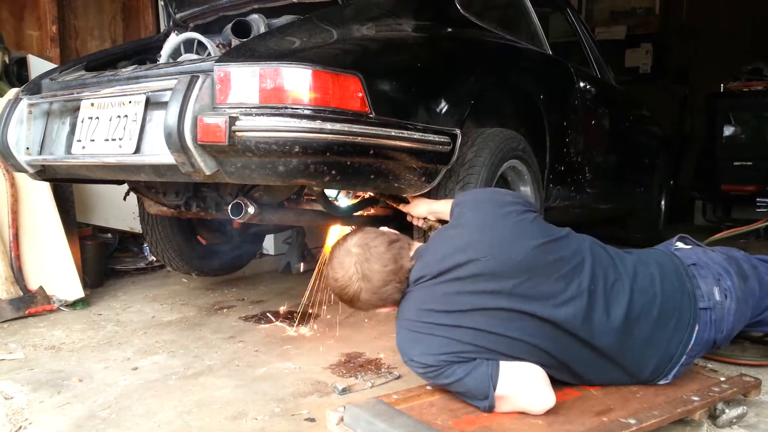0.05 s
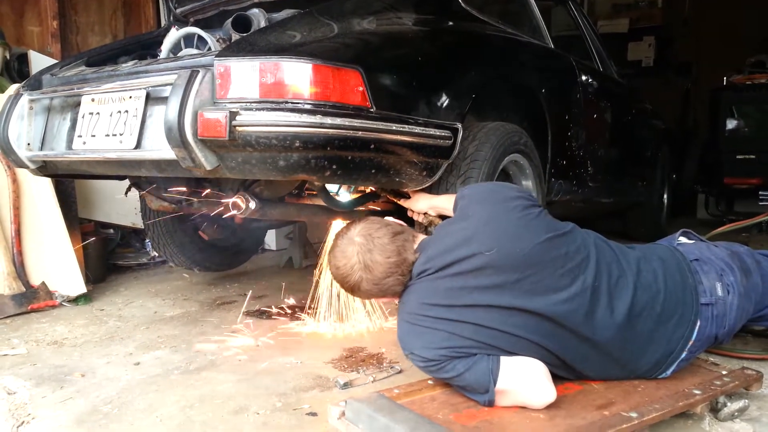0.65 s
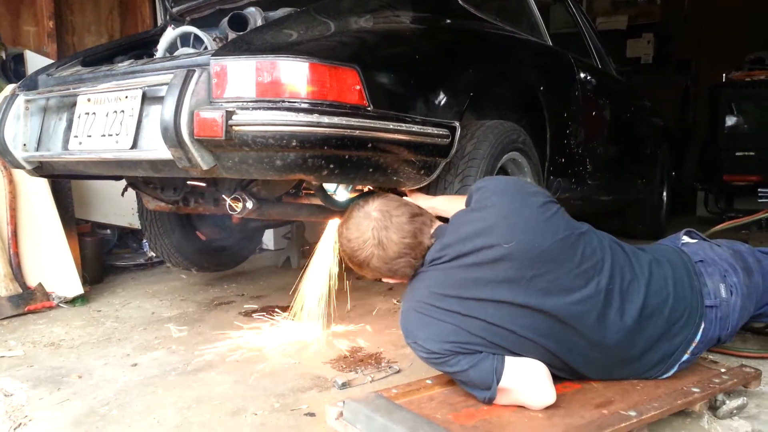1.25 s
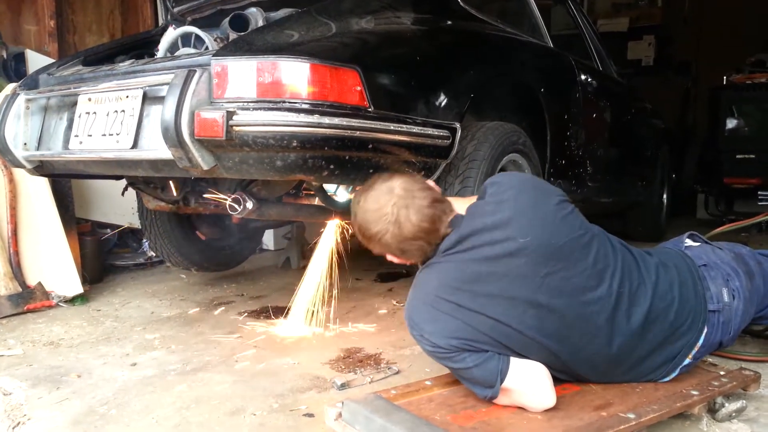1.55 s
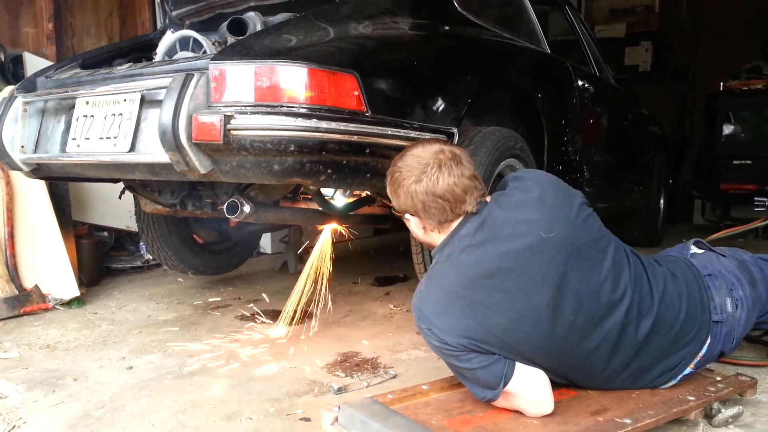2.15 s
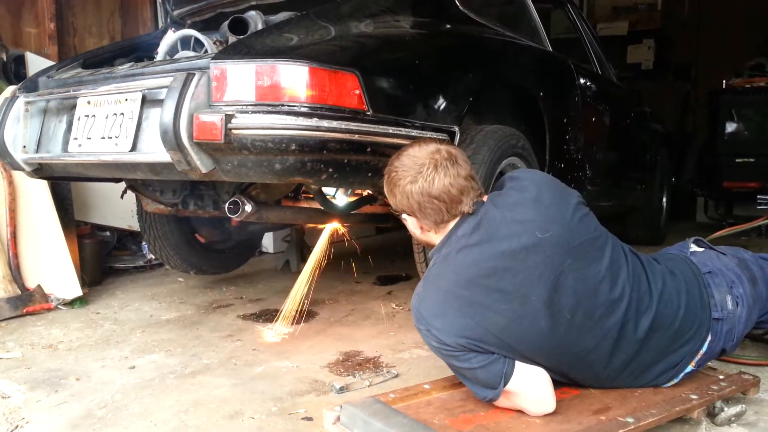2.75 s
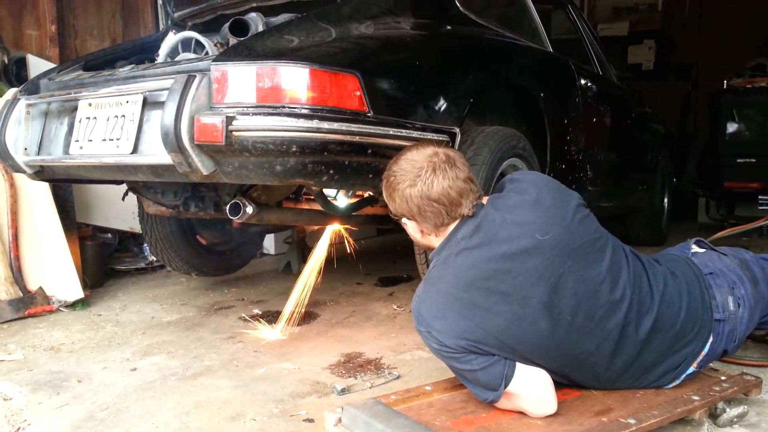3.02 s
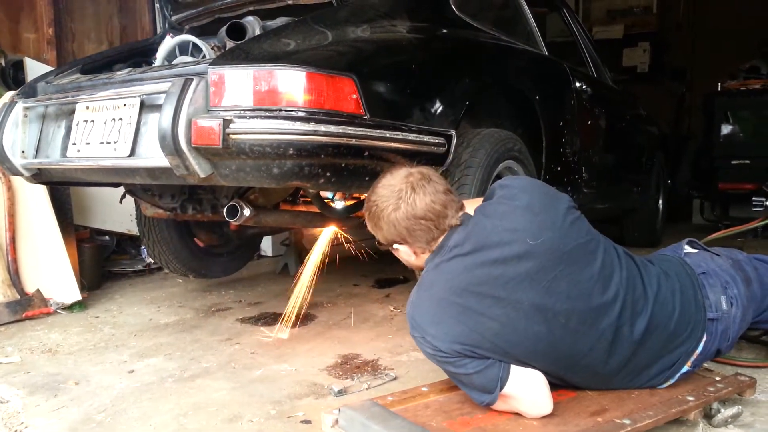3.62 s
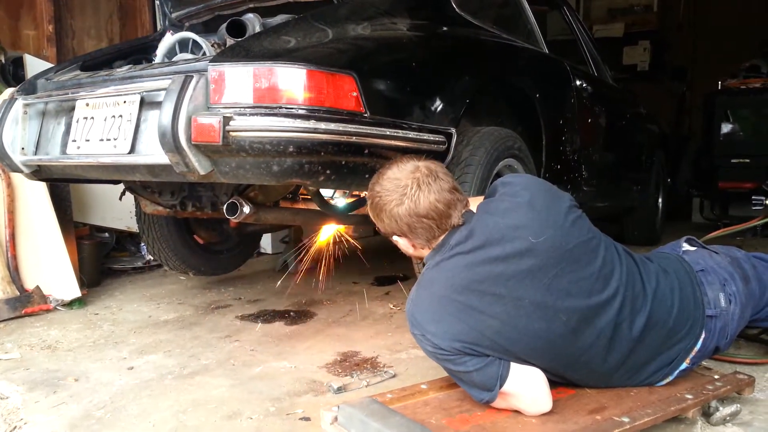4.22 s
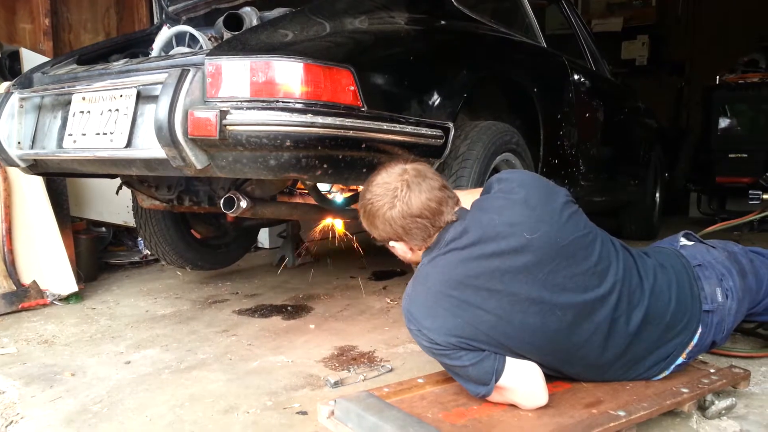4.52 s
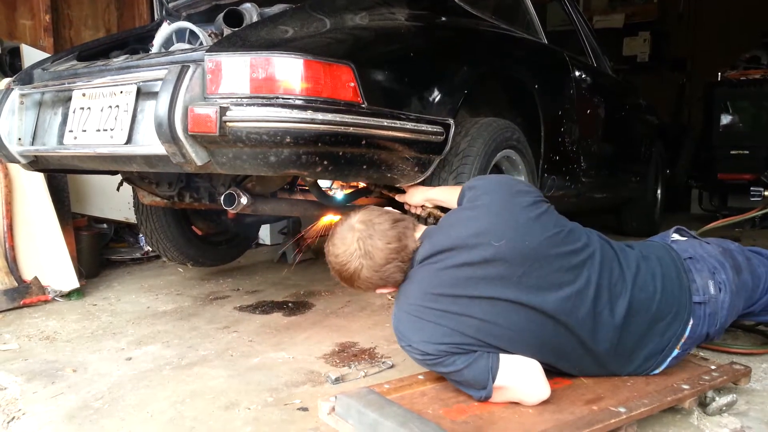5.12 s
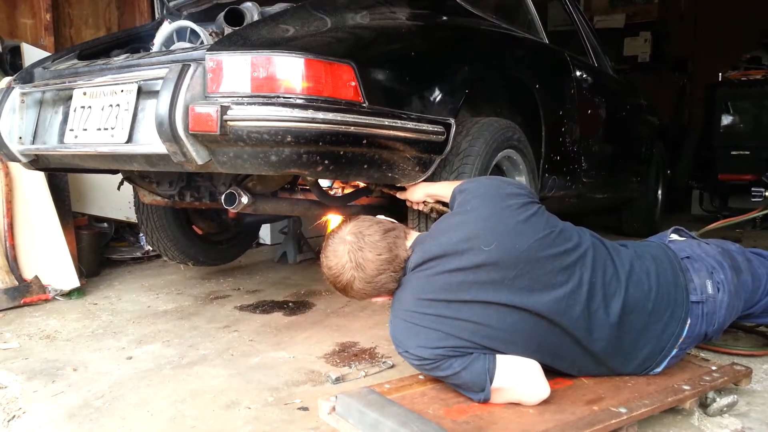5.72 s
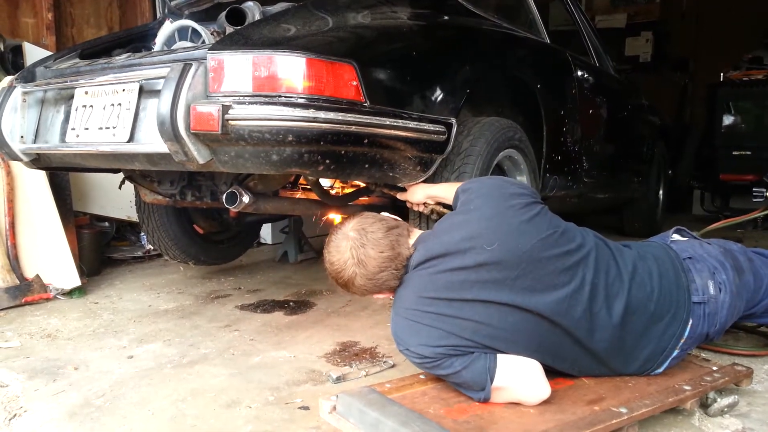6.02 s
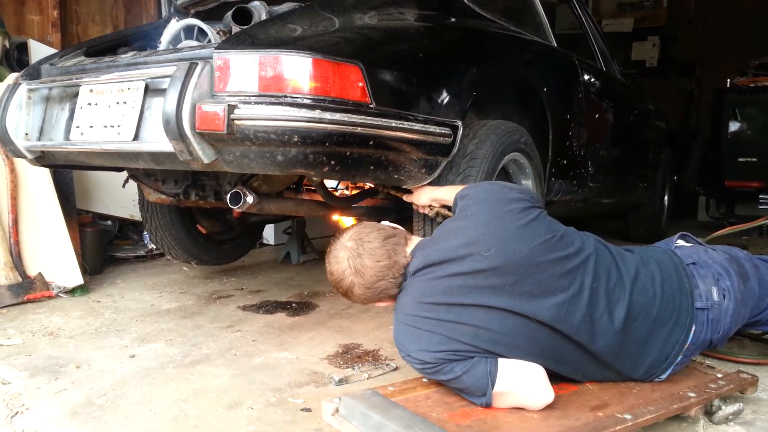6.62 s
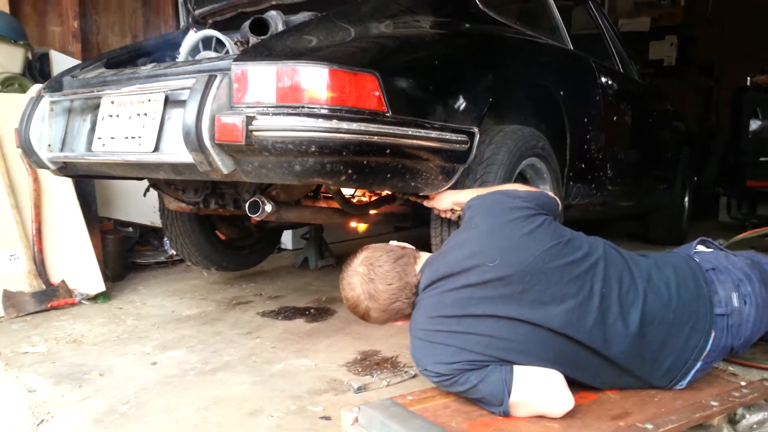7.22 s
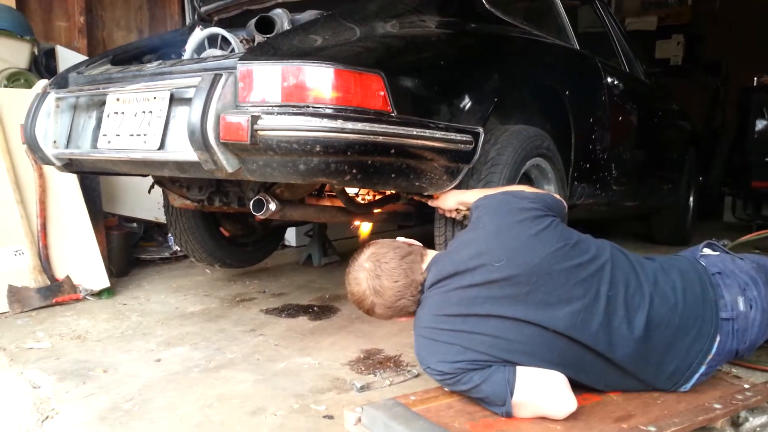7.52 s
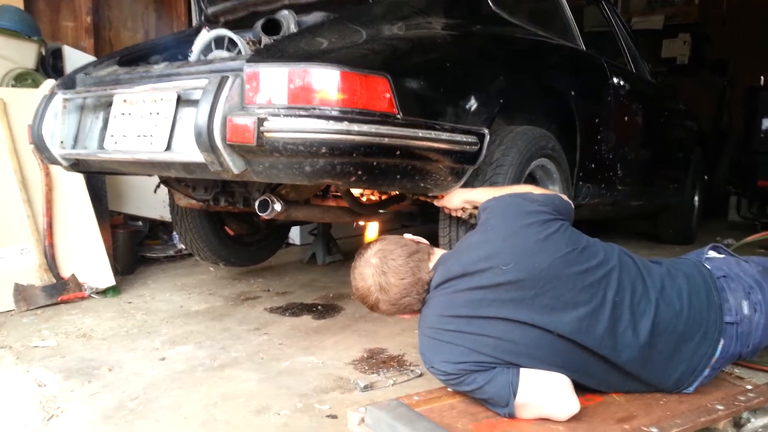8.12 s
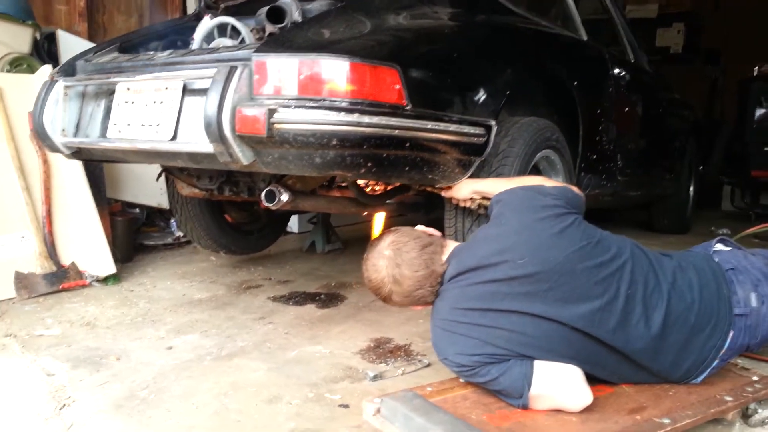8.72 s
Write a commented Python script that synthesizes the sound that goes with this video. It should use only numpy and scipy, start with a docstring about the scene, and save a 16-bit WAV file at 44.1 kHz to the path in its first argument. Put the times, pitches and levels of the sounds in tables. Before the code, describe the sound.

The loud hiss of a torch cutting metal in a garage eases into a quieter, wavering flame rush with faint crackling sparks.

```python
"""A hiss over a roaring flame: an oxy-fuel torch cuts a steel exhaust under a car in a garage.
The turbulent oxygen jet excites the resonances of the hollows round it, turns shrill as it breaks
through, and is shut off. The heating flame roars on, on and off the pipe, while molten slag spits.
Floor and car reflect the sound to a stereo microphone two metres away; air rumbles at its left port."""
import sys
import numpy as np
from scipy import signal
from scipy.fft import rfft, irfft, next_fast_len
from scipy.io import wavfile
from scipy.ndimage import uniform_filter1d

SR = 44100
rng = np.random.default_rng(int(sys.argv[2]) if len(sys.argv) > 2 else 0)


def store_pcm(level_fs):
    """Save levels as 16-bit WAV."""
    pcm = np.round(np.clip(level_fs, -1, 1) * 32767).astype(np.int16)
    wavfile.write(sys.argv[1], SR, np.atleast_2d(pcm).T)


N = 394693
TIME = np.arange(N) / SR
FFT_SIZE = next_fast_len(N, True)
FREQ = np.maximum(np.arange(FFT_SIZE // 2 + 1) * SR / FFT_SIZE, 1)

# Turbulence spectra: frequency_hz, density_db. Their modes: centre_hz, width_hz, lift_db (< 0: a notch)
JET_IN_CUT, JET_IN_CUT_MODES = [(60, -56), (140, -56), (232, -47), (290, -4.5), (600, -2.2), (800, -7),
                                (1100, -2), (2500, 5), (4200, 4.5), (5400, 3), (6300, -1), (8000, -2.5),
                                (10000, -6), (14300, -11.5)], [(499, 52, 10.6), (578, 28, 4.3), (720, 31, 5.4),
                                             (891.6, 65, 17.6), (1032, 86, 11), (1126, 118, 9.2),
                                             (1287, 34, 10.7), (1490, 48, 11), (1713, 173, 9.1),
                                             (2250, 170, 4.8), (2457, 130, 3.7), (2770, 140, 4.3),
                                             (3090, 35, 3.5), (3260, 54, 4.8), (3480, 150, 5.1),
                                             (3790, 320, 2.9), (4680, 160, 3.7), (5240, 68, 3.5)]
FREE_JET, FREE_JET_MODES = [(100, -59), (1000, -55), (4500, -4), (6500, -1), (8000, 1.5), (12500, 2.5),
                            (14500, -4.5)], [(7900, 500, 4.2), (9100, 90, 4), (9600, 90, 3.3),
                                              (10440, 150, 7.2), (11000, 80, 3), (11470, 230, 4.5)]
FLAME_ON_PIPE, FLAME_ON_PIPE_MODES = [(25, -44), (60, -51), (130, -15), (220, -6.5), (600, -9.5),
                                      (800, -5.5), (1100, 0), (2500, -1.1), (4200, -3), (5400, -7),
                                      (6300, -11), (10000, -12.5), (13000, -18), (14300, -23)], [(361, 38, 10), (445, 44, 15), (497, 37, 14.5),
                                                       (548, 38, -13), (600, 34, 8), (690, 120, 8),
                                                       (885, 43, 13.5), (1150, 140, 3.5), (1405, 80, 2.5),
                                                       (1750, 160, 3.5), (2165, 74, 1.5), (3590, 190, 4)]
FLAME_IN_AIR, FLAME_IN_AIR_MODES = [(25, -55), (60, -53), (130, -17), (220, -3), (290, -7.5), (600, -3),
                                    (800, -2), (1100, -2), (2500, -1.1), (4200, -1.9), (5400, -2.5),
                                    (6300, -7.5), (10000, -6.5), (13000, -8.5), (14300, -14)], [(362, 50, 4.2), (467, 64, 12.7), (780, 34, 2.8),
                                                      (910, 65, 7.2), (1150, 72, 4.8), (1420, 60, 3.3),
                                                      (1944, 65, 3.9), (2190, 40, 2.8), (4460, 430, 1.5)]
FLAME_IN_HOLE, FLAME_IN_HOLE_MODES = [(25, -55), (60, -53), (130, -18), (220, -8), (600, -9.5), (800, -5),
                                      (1100, -5), (2500, 4.5), (4200, -4.5), (5400, 0), (6300, -10),
                                      (10000, -12), (13000, -31), (14300, -23)], [(358, 63, 7.5), (470, 80, 0), (555, 36, -5),
                                                       (600, 35, 11), (760, 45, 6), (930, 98, 7),
                                                       (1150, 80, -1), (1470, 82, 9.5), (1790, 100, 4),
                                                       (1940, 100, 2), (3150, 210, -0.5), (3700, 130, 5),
                                                       (4530, 200, 7)]
FLARE_SPECTRUM, FLARE_MODES = [(130, -55), (240, -29), (320, 4), (600, -6), (800, 1), (1100, 3.5),
                               (2500, 6), (4200, -1.5), (5400, 2), (6300, -6), (14300, -12)], [(490, 77, 12), (548, 36, -7), (892, 35, 15), (1100, 110, 3),
                                              (1440, 100, 3), (1870, 160, 2.5), (3650, 250, 2)]

# Stream strength: time_s, level_db
CUT_LEVEL = [(.2, -13.5), (.5, -13.5), (.8, -13.5), (1.6, -13), (2.7, -13), (3.25, -13), (3.5, -15.5),
             (3.78, -17)]  # the jet in the steel fades as the cut opens
NOZZLE_LEVEL = [(0, -43), (4.0, -32.5), (5.7, -27), (6.1, -27), (7.0, -24), (7.9, -24.5), (8.3, -24),
                (8.5, -24.5), (8.9, -22)]  # the flame's hiss grows as the nozzle comes out from behind the pipe
# Sustained events: start_s, stop_s, level_db
PIPE_TOUCHES = [(-.2, .16, -19), (3.78, 4.25, -21), (4.25, 4.7, -22), (4.7, 5.5, -21.5), (5.5, 5.85, -22.5),
                (5.85, 6.29, -28), (6.29, 6.9, -24)]  # the flame plays on the pipe
HOLE_TOUCHES = [(7.955, 8.31, -22), (8.31, 8.38, -26), (8.38, 8.72, -22.5), (8.72, 9.2, -26.5)]  # the flame blows into the cut hole
FLARES = [(.145, .335, -18.5), (3.95, 4.21, -22.7), (4.73, 4.88, -27.5), (4.93, 5.1, -30),
          (5.37, 5.47, -25), (6.3, 6.45, -36), (6.53, 6.67, -30), (7.965, 8.14, -23), (8.4, 8.48, -28.5)]  # the steel flares up
RUMBLE_SPANS = [(2.1, 2.2, -39), (3.92, 5.68, -43), (5.92, 7.23, -47), (7.87, 8.95, -42.5)]  # a low rumble is heard on the left
# Bell-shaped events: peak_s, level_db, sigma_s
LOW_BLIPS = [(.29, -48, 0.01), (.4, -42.5, 0.015), (.52, -41.5, 0.013), (.59, -48, .012), (.68, -40, .018),
             (.93, -49, 0.027), (1.48, -45, 0.013), (1.66, -41, 0.0073), (1.95, -44, 0.011),
             (2.06, -41, 0.019), (2.7, -47, .012), (2.76, -36, 0.011), (3.2, -42.5, 0.015),
             (3.88, -39, 0.059), (4.08, -37, 0.082)]  # faint, brief blips near 220 Hz
RUMBLE_SWELLS = [(2.15, -28.5, 0.065), (4.01, -30, .03), (4.22, -34, 0.022), (4.77, -36, 0.026),
                 (5.064, -32, 0.023), (5.24, -36, 0.017), (5.35, -39, .02), (6.07, -37, .02),
                 (6.643, -21.5, 0.022), (6.79, -33, .018), (7.16, -31, 0.03), (7.902, -27, .022),
                 (8.137, -24, 0.048), (8.258, -26, 0.019), (8.78, -27.5, 0.042)]  # short, soft swells of the rumble
# Edges and hollows singing in the stream: start_s, stop_s, first_hz, last_hz, width_hz, relative_db
EDGE_TONES = [(-.2, 0.371, 1150, 1210, 130, -10), (.12, 0.496, 1853, 2037, 130, -13.5),
              (0.54, 1.196, 579, 595, 28, -16), (1.15, 2.696, 577.6, 568, 35, -24),
              (0.251, 1.046, 3630, 3860, 600, -10.5), (.75, 1.8, 1806, 1736, 220, -12),
              (.8, 1.496, 3760, 4350, 450, -13), (1.198, 3.107, 4740, 4700, 180, -25),
              (2.205, 3.8, 1010, 974, 110, -21), (2.6, 3.55, 3540, 3390, 240, -11),
              (2.699, 3.805, 8050, 7900, 550, -17), (3.3, 3.85, 566, 568, 45, -21.5),
              (3.75, 4.294, 1020, 910, 90, -11), (3.8, 4.304, 516, 486, 70, -8),
              (3.8, 4.456, 1480, 1444, 100, -11), (3.85, 4.35, 3520, 3540, 280, -9.5),
              (4.15, 4.9, 890, 885, 50, -15), (4.7, 5.75, 1180, 1160, 240, -12),
              (4.9, 5.703, 1413, 1370, 140, -18), (6.247, 6.9, 1820, 1845, 200, -12.5),
              (6.25, 7.1, 445, 453, 65, -17.5), (6.25, 7.0, 874, 868, 55, -16),
              (6.45, 7.054, 1172, 1159, 110, -13.5), (6.9, 7.7, 4500, 4290, 280, -13),
              (7.0, 8.31, 2000, 1956, 90, -16), (7.45, 8.198, 4300, 4560, 260, -18),
              (7.7, 9.205, 925, 981, 85, -16), (7.5, 9.198, 1446, 1438, 75, -16),
              (8.35, 9.3, 7300, 7330, 900, -14)]
# Hard surfaces near the flame: delay_ms, reflected_share, sway_ms
SURFACES = [(.85, 0.089, 0.058), (1.5, 0.066, 0.14), (3.0, 0.11, 0.14), (5.1, 0.17, 0.069),
            (7.2, 0.17, 0.18), (10.1, 0.13, 0.091)]
# Gaps in the low roar: start_s, stop_s, cutoff_hz
THINNINGS = [(1.344, 1.43, 370), (1.752, 1.982, 350), (3.554, 3.76, 410)]

# The two microphone ports
PORT_COHERENCE = [(60, .5), (200, .8), (400, .9), (700, .88), (1300, .72), (2500, .55), (5000, .52),
                  (14000, .38)]  # frequency_hz, shared_power_fraction
PORT_PHASE = [(600, 0), (1200, -.25), (1500, -1.0), (2200, -1.3), (2500, -2.6), (3450, 0), (4800, -1.4),
              (6000, -1.9), (11200, -2.3), (14200, -2.5)]  # frequency_hz, left_lead_rad
PORT_BALANCE = [(300, 0.74), (700, -0.25), (1100, 1.5), (2200, 0.68), (4200, -1), (8000, 0.79),
                (13000, 1.7)]  # frequency_hz, left_minus_right_db
PORT_COLOUR = [(8500, 0), (9900, -2), (11000, -0.5), (12100, -0.2), (12900, -0.5), (13900, 3)]  # frequency_hz, gain_db


def undb(db):
    """Amplitude grows tenfold for every 20 dB."""
    return 10 ** (np.asarray(db) / 20)


def across(points):
    """Interpolation of (frequency_hz, value) points on a logarithmic frequency axis."""
    hz, value = np.transpose(points)
    return np.interp(np.log(FREQ), np.log(np.maximum(hz, 1)), value)


def waveform(spectrum):
    """The inverse Fourier transform turns a spectrum into a signal."""
    return irfft(spectrum, FFT_SIZE)[..., :N]


def filtered(x, gain):
    """Linear filtering multiplies each frequency by its gain."""
    return waveform(rfft(x, FFT_SIZE) * gain)


def unit(x):
    """Normalisation brings the mean of the channels to rms 1."""
    return x / np.std(np.atleast_2d(x).mean(axis=0))


def wander(rate_hz):
    """Twice-smoothed random steps give a slow fluctuation with a spread near 1."""
    hold = int(SR / rate_hz)
    steps = np.repeat(rng.standard_normal(N // hold + 1), hold)
    return np.sqrt(2) * uniform_filter1d(uniform_filter1d(steps, hold), hold)[:N]


def step(at_s, edge_s):
    """A raised-cosine transition from 0 to 1, centred on a moment."""
    return (1 + np.sin(np.pi * np.clip((TIME - at_s) / edge_s, -.5, .5))) / 2


def held(events, edge_s):
    """The envelope of events that rise, hold and fall."""
    return sum(undb(db) * step(start, edge_s) * (1 - step(stop, edge_s)) for start, stop, db in events)


def swells(events):
    """The envelope of events that swell and fade as Gaussian curves."""
    return sum(undb(db) * np.exp(-np.minimum(((TIME - peak) / sigma) ** 2, 100) / 2)
               for peak, db, sigma in events)


def stereo_noise():
    """Partial coherence: each port's noise spectrum has a shared direct part and its own scattered part."""
    direct, left, right = rfft(rng.standard_normal((3, FFT_SIZE)))
    shared = np.clip(across(PORT_COHERENCE), 0, 1)
    left = np.sqrt(shared) * direct * np.exp(1j * across(PORT_PHASE)) + np.sqrt(1 - shared) * left
    right = np.sqrt(shared) * direct + np.sqrt(1 - shared) * right
    lean = undb(across(PORT_BALANCE) / 2)
    return np.array([left * lean, right / lean])


def gas_stream(spectrum, modes):
    """Resonance: broadband turbulence is lifted at the modes of the hollows it blows into."""
    lift_db = sum(lift / (1 + (2 * (FREQ - hz) / width) ** 2) for hz, width, lift in modes)
    return unit(waveform(stereo_noise() * undb(across(spectrum) + lift_db)))


def stream_gains():
    """Flow noise follows the path of the gas: two gains for the oxygen jet, three for the flame."""
    pressed = step(at_s=0.15, edge_s=0.084)
    lever = pressed * (1 - step(at_s=3.8, edge_s=0.089))
    half_pressed = (1 - pressed) * undb(-6)
    breakthrough = step(at_s=3.355, edge_s=0.035)
    in_cut = (lever + half_pressed) * undb(np.interp(TIME, *np.transpose(CUT_LEVEL)))
    free = lever * undb(-25 + 8.5 * breakthrough)
    on_pipe = held(PIPE_TOUCHES, edge_s=0.12)
    in_air = (1 - lever) * undb(np.interp(TIME, *np.transpose(NOZZLE_LEVEL)))
    in_hole = held(HOLE_TOUCHES, edge_s=0.13)
    return np.array([in_cut, free, on_pipe, in_air, in_hole])


def edge_tones(waver_db, pitch_waver):
    """Flow sweeping over an edge or hollow sings in narrow bands that swell, glide and fade."""
    eddies, tones = stereo_noise(), np.zeros((2, N))
    sway = 1 + pitch_waver * wander(5)
    for start, stop, first_hz, last_hz, width_hz, db in EDGE_TONES:
        band = unit(waveform(eddies / (1 + (1.38 * (FREQ - first_hz) / width_hz) ** 2) ** 2))
        on = (TIME > start) & (TIME < stop)
        progress = (TIME[on] - start) / (stop - start)
        # reading the band at a changing speed makes its pitch glide
        read_s = np.cumsum((last_hz / first_hz) ** progress * sway[on]) / SR
        swell = 2 * np.sqrt(progress * (1 - progress)) * undb(db + waver_db * wander(11)[on])
        tones[:, on] += np.array([np.interp(read_s, TIME, port) for port in band]) * swell
    return tones


def hand_drift(x, rate_hz, depth_db):
    """Amplitude modulation: as the hand moves, each octave of the hiss swells and sinks on its own."""
    octave = np.clip(np.log2(FREQ / 400), 0, 5)
    bands = (filtered(x, np.maximum(1 - abs(octave - k), 0)) for k in range(6))
    return sum(band * undb(depth_db * wander(rate_hz)) for band in bands)


def reflections(x, sway_hz, port_skew_ms):
    """Comb filtering: echoes off floor and car interfere with the direct sound, shifting with the hand."""
    combined, skew_ms = x.copy(), port_skew_ms * wander(sway_hz)
    for delay_ms, share, sway_ms in SURFACES:
        path_ms = delay_ms + sway_ms * wander(sway_hz)
        for port, side in enumerate((1, -1)):
            lag_s = (path_ms + side * skew_ms) / 1000
            combined[port] += share * np.interp(TIME - lag_s, TIME, x[port], left=0)
    return combined


def garage(x, t60_s, wet_db):
    """Reverberation: the cluttered room adds a short, dense tail that decays exponentially."""
    t = TIME[:SR // 2]
    tail = rng.standard_normal((2, len(t))) * np.exp(-np.log(1000) * t / t60_s) * (t > .012)
    tail /= np.sqrt(np.sum(tail ** 2, axis=1, keepdims=True))
    wet = signal.fftconvolve(x, tail, axes=1)[:, :N]
    colour = undb(across([(200, -5), (1200, -1), (4000, 2), (14000, -1)]))
    return x + undb(wet_db) * filtered(wet, colour)


def torch(flutter_db, sputter_db):
    """Superposition: jet and flame noises add, and the melting edge makes them flare and flutter."""
    streams = [(JET_IN_CUT, JET_IN_CUT_MODES), (FREE_JET, FREE_JET_MODES),
               (FLAME_ON_PIPE, FLAME_ON_PIPE_MODES), (FLAME_IN_AIR, FLAME_IN_AIR_MODES),
               (FLAME_IN_HOLE, FLAME_IN_HOLE_MODES)]
    gains, flare_gain = stream_gains(), held(FLARES, edge_s=0.044)
    flow = sum(gain * gas_stream(*stream) for gain, stream in zip(gains, streams))
    flow += flare_gain * steel_flare(roughness_db=2.2)
    strength = np.linalg.norm([*gains, flare_gain], axis=0)  # independent noises add in power
    flow += strength * edge_tones(waver_db=0.7, pitch_waver=0.0055)
    flow = hand_drift(thin_roar(flow, edge_s=0.061), rate_hz=7, depth_db=0.3)
    flow *= undb(flutter_db * wander(21) + sputter_db * wander(60))
    flow = reflections(flow, sway_hz=1.5, port_skew_ms=0.018)
    return garage(flow, t60_s=0.19, wet_db=-8.5)


def slag(rate_hz, spread_db, level_db):
    """A Poisson process: molten drops burst in tiny ticks, louder as the gas blows harder."""
    blowing = np.linalg.norm(stream_gains(), axis=0)
    bursts = rng.random(N) < rate_hz / SR
    sizes = undb(spread_db * np.minimum(rng.exponential(size=N), 4))
    t = TIME[:SR // 200]
    crack = rng.standard_normal((2, len(t))) * np.exp(-t / 0.0014)
    ticks = signal.fftconvolve((bursts * sizes)[None], crack, axes=1)[:, :N]
    colour = undb(across([(100, -55), (2000, 4), (5000, 6), (14000, -9)]))
    return unit(filtered(ticks, colour)) * blowing * undb(level_db)


def steel_flare(roughness_db):
    """Fast amplitude modulation is heard as roughness in the midrange rush of flaring steel."""
    return undb(roughness_db * wander(45)) * gas_stream(FLARE_SPECTRUM, FLARE_MODES)


def low_blips(centre_hz, width_hz):
    """Narrow-band noise in brief pulses is heard as faint low blips that come and go under the hiss."""
    band = waveform(stereo_noise() / (1 + (2 * (FREQ - centre_hz) / width_hz) ** 10))
    return unit(band) * swells(LOW_BLIPS)


def thin_roar(x, edge_s):
    """High-pass filtering: the low roar drops out briefly and leaves the hiss."""
    lows = sum(filtered(x, 1 / (1 + (FREQ / hz) ** 20)) * step(start, edge_s) * (1 - step(stop, edge_s))
               for start, stop, hz in THINNINGS)
    return x - lows


def port_rumble(flutter_db, level_db, right_db):
    """Low-frequency noise: a rumble comes and goes at the left port, faint at the right."""
    span_colour = undb(across([(20, -28), (45, -11), (80, 1), (140, -1), (220, -1), (400, -39)]))
    swell_colour = undb(across([(20, -42), (60, -10), (110, -5), (200, 1.5), (290, -5.5), (500, -22.5)]))
    span_noise, swell_noise = rng.standard_normal((2, 2, N))
    envelope = undb(-80) + held(RUMBLE_SPANS, edge_s=0.062)  # almost no rumble between spans
    flutter = undb(flutter_db * np.minimum(wander(17), 1))
    sustained = unit(filtered(span_noise, span_colour)) * envelope * flutter
    brief = unit(filtered(swell_noise, swell_colour)) * swells(RUMBLE_SWELLS)
    return (sustained + brief) * undb(level_db) * np.array([[1], [undb(right_db)]])


def scene():
    """Superposition: torch and slag are heard together with faint low blips and a rumble."""
    spatter = slag(rate_hz=40, spread_db=4, level_db=-28)
    blips = low_blips(centre_hz=223, width_hz=94)
    roar = undb(-0.5) * torch(flutter_db=0.14, sputter_db=0.45)
    return roar + spatter + blips + port_rumble(flutter_db=4.5, level_db=-3.5, right_db=-23)


def record(dry):
    """Frequency response: the ports colour the treble, and a steep low-pass filter cuts the top."""
    cutoff_hz = 14610
    return filtered(dry, undb(across(PORT_COLOUR)) / np.sqrt(1 + (FREQ / cutoff_hz) ** 1200))


dry = scene()
out = record(dry)
store_pcm(out)
```